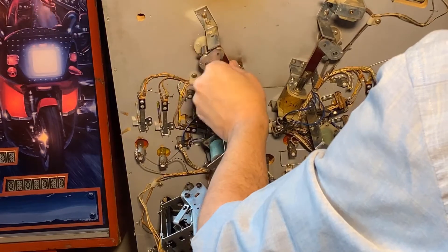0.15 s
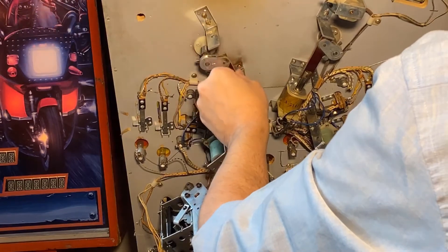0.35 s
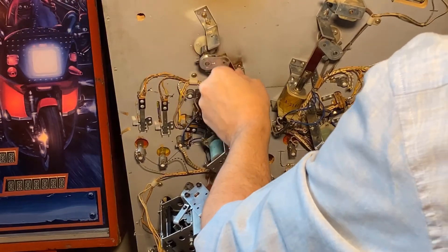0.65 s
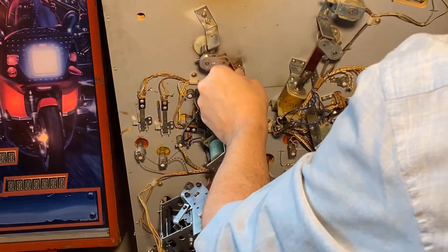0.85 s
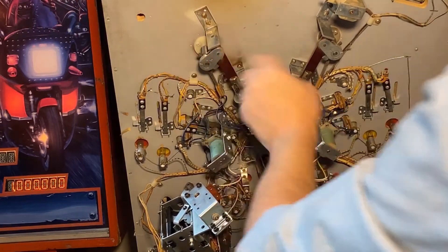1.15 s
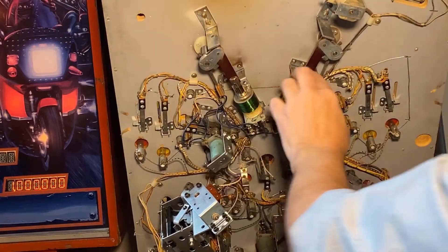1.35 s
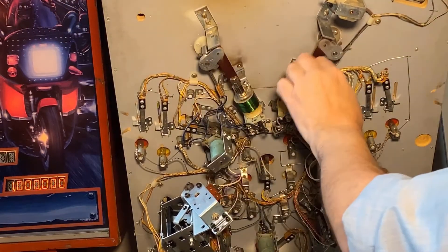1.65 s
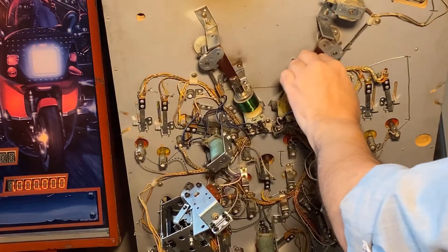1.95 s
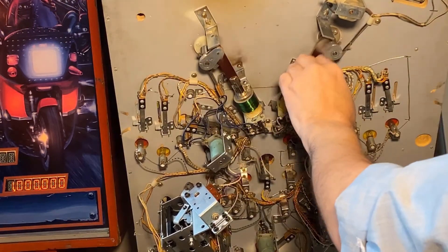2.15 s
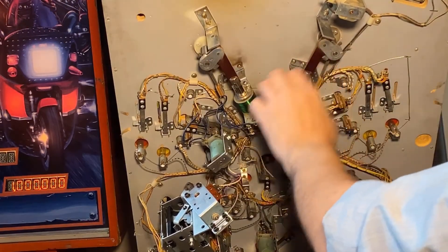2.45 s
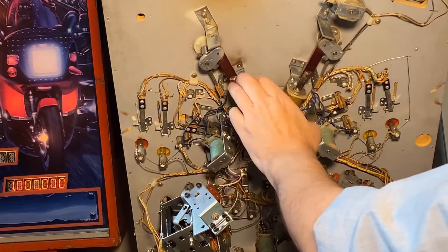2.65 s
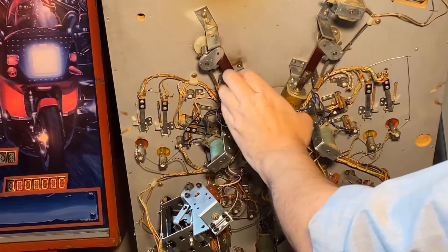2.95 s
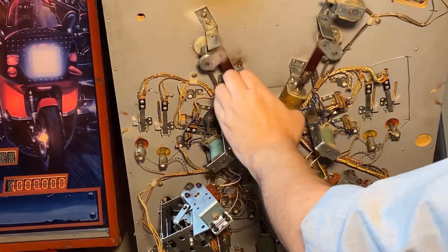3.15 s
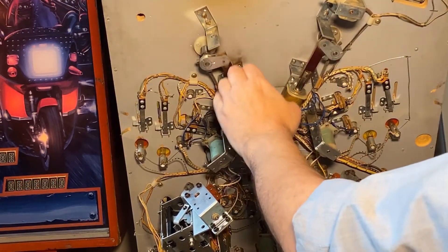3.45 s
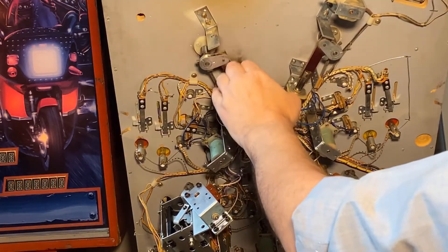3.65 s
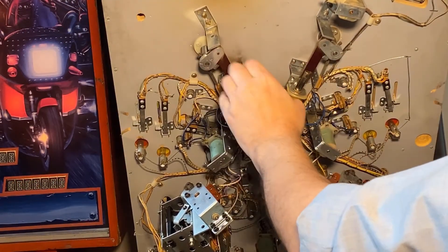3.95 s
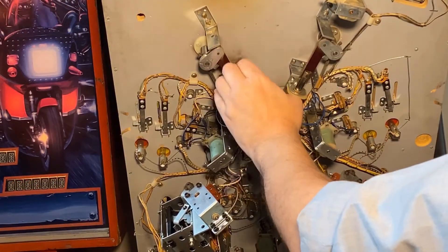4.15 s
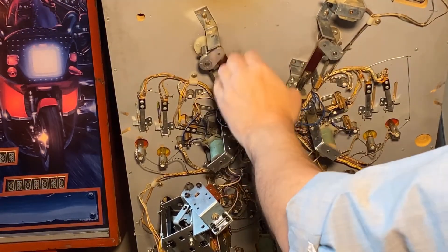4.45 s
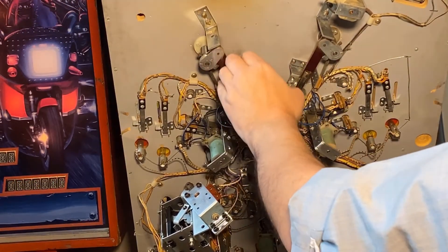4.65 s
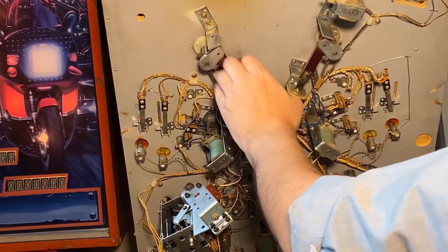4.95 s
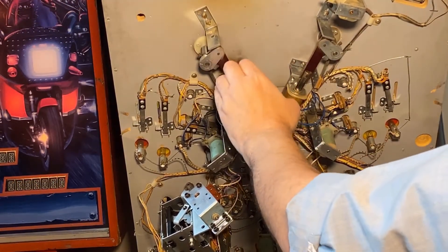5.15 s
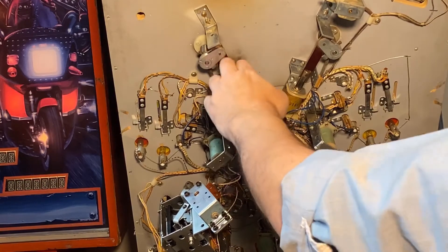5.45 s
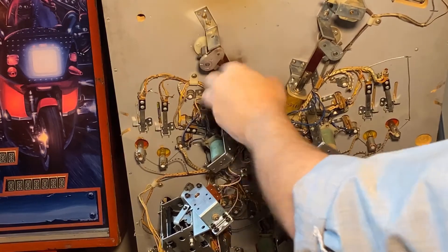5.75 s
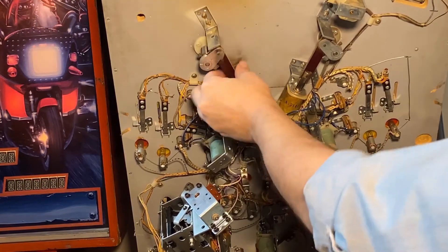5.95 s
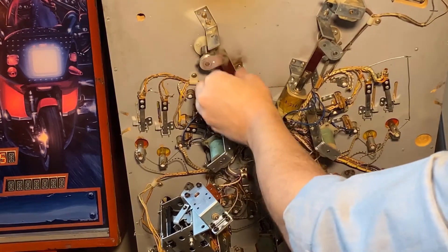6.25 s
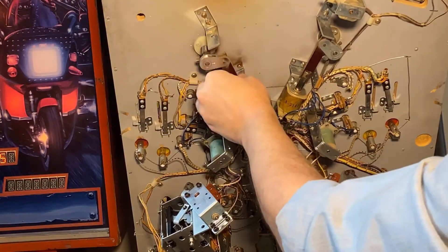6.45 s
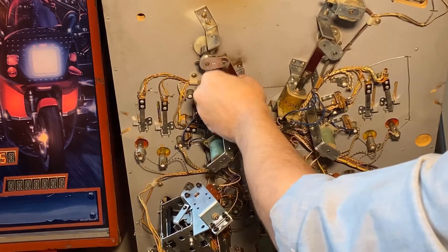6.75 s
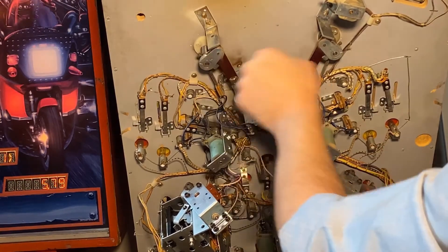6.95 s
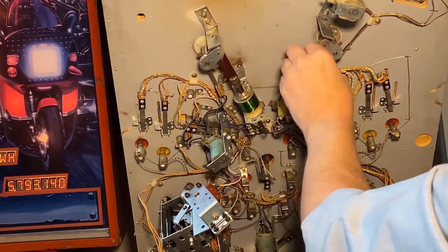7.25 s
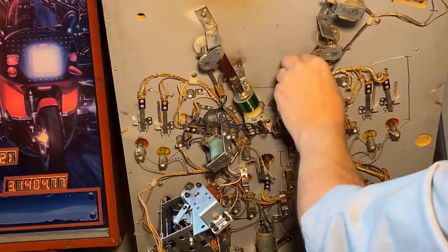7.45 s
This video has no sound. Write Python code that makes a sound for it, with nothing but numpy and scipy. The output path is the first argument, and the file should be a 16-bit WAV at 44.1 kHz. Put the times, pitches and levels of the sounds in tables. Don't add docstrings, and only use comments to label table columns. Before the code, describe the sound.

In a small workshop, a hand works two pinball flipper mechanisms close to a small camera microphone. Hard steel clacks at the stops are answered by woodier multi-blow clunks as the crank falls back. Two slow pairs come first, then a rapid run on the second mechanism, then spaced pairs on the first, and a final hard pair. Loose links tick, fingers rustle and tap, over low handling rumble.

```python
import sys
import numpy as np
from scipy import signal
from scipy.fft import rfft, irfft, next_fast_len
from scipy.io import wavfile
from scipy.ndimage import uniform_filter1d, map_coordinates

SR = 44100
rng = np.random.default_rng(int(sys.argv[2]) if len(sys.argv) > 2 else 0)


def attenuation_scalar(level_db):
    decades = np.asarray(level_db, float) / 20
    return 10 ** decades


def master(y):
    cut = np.clip(np.atleast_2d(y).T, -1, 1)
    pcm = np.round(cut * 32767)
    wavfile.write(sys.argv[1], SR, pcm.astype(np.int16))


N = 335138


def unit(x):
    return x / np.sqrt(np.mean(x ** 2) + 1e-20)


def along(points, hz):
    f, v = np.transpose(points)
    return np.interp(np.log(hz + 1), np.log(f + 1), v)


def wobble(rate):
    knots = rng.standard_normal(int(N * rate / SR) + 4)
    return map_coordinates(knots, [np.arange(N) * rate / SR])


def filtered(x, response, pad=8192):
    n = x.shape[-1]
    m = next_fast_len(n + pad)
    return irfft(rfft(x, m) * response(np.fft.rfftfreq(m, 1 / SR)), m)[..., :n]


def resonances(modes):
    skirt = 1.7

    def peak(f, centre, width):
        return (f * width) ** 2 / ((centre * centre - f * f) ** 2 + (f * width) ** 2)

    def response(f):
        power = sum(attenuation_scalar(2 * db) * peak(f, centre, width) ** skirt for centre, width, db in modes)
        cepstrum = irfft(np.log(power + 1e-9) / 2)
        cepstrum[1:len(f) - 1] *= 2
        cepstrum[len(f):] = 0
        return np.exp(rfft(cepstrum))
    return response


def noise(spectrum):
    return unit(filtered(rng.standard_normal(N), lambda hz: attenuation_scalar(along(spectrum, hz))))


def gestures(rows, rise, fall):
    t = np.arange(N) / SR
    gain = np.zeros(N)
    for s, held, db in rows:
        early = np.maximum(s - t, 0)
        late = np.maximum(t - s - held, 0)
        gain += attenuation_scalar(db - rise * early - fall * late)
    return gain


# f/Hz, level/dB per Hz
AIR = [(29, -43), (50, -13.5), (170, -11), (320, -18), (1500, -18), (2490, -29), (15300, -35), (16500, -41)]


def hush():
    return attenuation_scalar(-67) * noise(AIR)


# f/Hz, width/Hz, level/dB
FAN = [(172.1, 3, -5), (250, 24, -5.5), (350, 5.6, -2), (470, 49, -12.5), (1560, 48, -22.5)]


def far_fan():
    swell_db = 4 * wobble(3.2)
    return attenuation_scalar(-66 + swell_db) * unit(filtered(rng.standard_normal(N), resonances(FAN)))


# t/s, held/s, level/dB
SHAKE = [(0.62, 0.02, -67), (0.81, 0.092, -62), (1.05, 0.092, -61.5), (1.228, 0.013, -42),
         (1.275, .03, -51), (1.33, 0.027, -56), (1.46, 0.0092, -39), (1.53, 0.24, -52.5), (1.91, 0.19, -66),
         (2.25, 0.19, -64), (2.74, 0.093, -74), (3.15, 0.071, -54.5), (3.75, 0.022, -55),
         (4.27, 0.055, -59), (4.44, 0.026, -56), (4.62, 0.37, -65), (5.24, 0.34, -58.5), (5.63, 0.028, -66),
         (5.95, 0.039, -57), (6.06, .6, -65), (6.76, 0.13, -59), (7.0, 0.64, -70), (7.59, .01, -64)]
# f/Hz, level/dB per Hz
RUMBLE = [(12, -32), (25, 1), (60, -11), (110, -10), (200, -10.5), (400, -28), (800, -61.5)]
# t/s, level/dB, half width/s
KNOCKS = [
    (1.2543, -28, 0.0019),
    (1.6, -42, 0.0031),
    (1.3615, -44, 0.0035),
    (5.9717, -30.5, 0.0012),
    (4.446, -41, 0.0012),
]


def stand():
    grip = attenuation_scalar(-70) + gestures(SHAKE, rise=580, fall=400)
    rumble = grip * noise(RUMBLE)
    knocks, t = np.zeros(N + SR), np.arange(SR // 4) / SR
    for s, db, half_s in KNOCKS:
        u = (t - 0.02) / half_s
        knocks[round((s - 0.02) * SR):][:len(t)] -= attenuation_scalar(db) * (1 - u * u) * np.exp(-u * u / 2)
    drift = attenuation_scalar(-45) * unit(np.gradient(wobble(6.4)))
    return rumble + knocks[:N] + drift


# t/s, held/s, level/dB
HANDS = [(0.0, 0.014, -55.5), (0.5, 0.052, -49), (0.89, 0.17, -49), (1.3, 0.19, -55), (1.59, 0.074, -43),
         (1.86, 0.36, -43), (2.18, 0.092, -43), (2.7, 0.28, -55.5), (3.34, 0.059, -41.5), (3.65, 0.19, -54),
         (4.36, .04, -43), (4.7, .05, -50.5), (5.45, 0.4, -56), (6.05, 0.76, -49), (6.74, 0.032, -45.5),
         (7.13, 0.048, -42.5), (7.58, .03, -53)]
# f/Hz, level/dB per Hz
SKIN = [(120, -40.5), (250, -1), (500, -5.5), (800, -3), (1300, -14), (2200, -19.5), (4000, -27.5),
        (12000, -50)]


def hands():
    lumps = attenuation_scalar(2.5 * wobble(30) + 3 * wobble(150))
    movement = attenuation_scalar(-68.5) + gestures(HANDS, rise=240, fall=92)
    return attenuation_scalar(-5.5) * movement * unit(lumps * noise(SKIN))


# f/Hz, level/dB
SCATTERED = [(300, 4), (1500, 0), (4000, 0), (6300, 0), (8800, -6), (11000, -8), (14000, -6.5), (16000, -5)]


def dying_noise(decays, rise_s, size):
    z = signal.stft(rng.standard_normal(size), nperseg=512)[2]
    power = uniform_filter1d(uniform_filter1d(np.abs(z) ** 2, size=2, axis=0), size=3, axis=1)
    even = z / (power + 1e-12) ** 0.3
    even *= attenuation_scalar(2.5 * rng.standard_normal((len(z), 1)))
    hz, t, z = signal.stft(signal.istft(even, nperseg=512)[1][:size], SR, nperseg=128)
    patches = uniform_filter1d(rng.standard_normal(z.shape), size=3, axis=0)
    patches = unit(uniform_filter1d(patches, size=10, axis=1))
    fade_db = -60 * t / along(decays, hz)[:, None]
    z = z * attenuation_scalar(1.5 * patches + along(SCATTERED, hz)[:, None] + fade_db)
    tail = signal.istft(z, SR, nperseg=128)[1][:size]
    tail = tail * (1 - np.exp(-np.arange(size) / SR / rise_s))
    return tail / np.linalg.norm(tail)


# f/Hz, t60/s
ROOM = [(200, 0.48), (530, 0.32), (1400, 0.43), (3700, 0.3), (9700, 0.25), (16000, 0.21)]
# f/Hz, t60/s
RATTLE = [(300, 0.26), (1500, 0.2), (5000, 0.069), (12000, 0.043)]


def contacts(hits, strike_db, chatter_s, rattle_db, room_db, bounce_s=0, bounce_db=0, listed=()):
    out, t = np.zeros(N + SR), np.arange(3000) / SR
    wall = round(0.0094 * SR)
    for s, db, modes, wet_db in hits:
        blows = [(at, hard) for at, hard in listed if -0.003 < at - s < 0.02]
        blows = blows or [(s - 0.0005, 0), (s + bounce_s * rng.uniform(0.93, 1.4), bounce_db)]
        start, shape, strikes = blows[0][0], 0, np.zeros(len(t))
        for at, hard in blows:
            later = np.maximum(t - (at - start), 0)
            shape = shape + attenuation_scalar(hard - 60 * later / chatter_s) * (1 - np.exp(-later / 0.00023))
            strikes[round((at - start) * SR) + 14] = attenuation_scalar(hard) * rng.choice([-1, 1])
        strikes = np.convolve(strikes, np.hanning(5), "same")
        strikes /= np.linalg.norm(strikes)
        grain = attenuation_scalar(3 * np.repeat(rng.standard_normal(250), 12))
        chatter = shape * rng.standard_normal(len(t)) * grain
        force = chatter / np.linalg.norm(chatter) + attenuation_scalar(strike_db) * strikes

        def evenly(hz):
            power = np.abs(rfft(force, 2 * len(hz) - 2)) ** 2
            return 1 / np.sqrt(uniform_filter1d(power, size=70))

        force = filtered(force, evenly, pad=1096)
        force[wall:] += attenuation_scalar(-10.5) * force[:-wall]
        blow, ideal = filtered(np.array([force, t == 0]), resonances(modes), pad=1024)
        answer = attenuation_scalar(room_db - 3) * dying_noise(ROOM, 0.00055, size=18000)
        lumps_db = 3 * np.repeat(rng.standard_normal(100), 50)
        answer[:5000] += attenuation_scalar(rattle_db - 3 + lumps_db) * dying_noise(RATTLE, 0.0013, size=5000)
        sound = attenuation_scalar(wet_db) * signal.fftconvolve(ideal, answer)
        sound[:len(t)] += blow
        out[round(start * SR):][:len(sound)] += attenuation_scalar(db + 10.5) / np.linalg.norm(ideal) * sound
    return out[:N]


# t/s, peak level/dB, board f/Hz, board over shaken parts/dB, room level/dB
TAPS = [(0.713, -37, 720, 24, 5), (0.893, -35, 550, 26, 9.5), (0.921, -29.5, 570, 33, 2),
        (2.327, -22, 750, 18, -8), (3, -48, 900, 14.5, 8), (2.716, -42, 560, 19, -1),
        (2.78, -52, 780, 28, 9.5), (2.917, -36, 610, 18, 6.5), (2.964, -36, 1130, 19, 3),
        (3.079, -50, 630, 27, 12), (3.299, -29, 980, 20, 0), (3.471, -26.5, 900, 39, -6),
        (3.549, -52, 910, -2, -1), (3.596, -31.5, 530, 28, -1.5), (4.11, -50.5, 910, 42, 8),
        (4.8, -36.5, 710, 26, 5), (5.148, -37, 694, 34, -3), (7.148, -25, 700, 22, 1),
        (7.2915, -39.5, 635, 20, 5.5), (1.243, -50.5, 850, 30, 5), (1.378, -51, 1100, 30, 4.5),
        (0.47, -46, 1000, 29, -6), (2.833, -42, 1070, 16, 1), (6.566, -27.5, 2050, 16, 5.5),
        (3.6, -36, 580, 37, 3), (2.593, -34.5, 1230, 11, 0.5), (5.6, -31, 660, 35, -6),
        (0.004, -55.5, 1400, 38, 3.5), (1.3, -51.5, 860, 38, -2.5), (0.724, -40.5, 480, 28, 2.5),
        (7.8, -44, 1000, 28, 2), (2.985, -46, 840, 22, -1), (4.128, -47, 850, 38, -0.5)]
# t/s, peak level/dB, link f/Hz, board over link/dB, room level/dB
TICKS = [(0.609, -36.5, 4970, 5, -4), (0.725, -30, 4300, 12, -7), (0.871, -33, 4800, -17, -3),
         (1.433, -25.5, 3980, -14, 3.5), (1.536, -35, 7400, -13, 4.5), (2.214, -23, 5800, -16, -7),
         (2.591, -36, 8500, 4, 0.5), (2.632, -52.5, 5280, -0.5, 15.5), (2.639, -42, 4770, 3, 8.5),
         (6.564, -36, 7000, -1.5, 11.5), (2.914, -31, 8500, 8, -12), (3.217, -41, 3700, -5.5, 1),
         (3.978, -33.5, 5000, -0.5, -3.5), (4.657, -45, 6400, -2, 0), (4.721, -37.5, 4680, -1, -7),
         (4.727, -34.5, 4870, 8, 0), (4.888, -43, 5120, -1.5, 7.5), (5.558, -35.5, 5300, 2, 2),
         (5.642, -17.5, 5200, -11.5, 0), (5.954, -49.5, 4660, 2, 7), (6.297, -31, 6150, -23, -5),
         (6.766, -35, 3950, -3, 2), (7.105, -29.5, 3600, 2, 5), (7.2525, -42, 6100, -13, -7),
         (7.253, -44, 13700, -29, -6), (7.1435, -52, 7000, -4, 2), (0.898, -47.5, 10500, -18, 0),
         (6.493, -47, 10000, -9, 6), (7.268, -51, 5470, 1, 0), (7.3155, -55, 5500, -2, 1),
         (4.801, -48, 5000, -8, -4), (4.4058, -16.5, 2400, 4.5, -7.5), (7.106, -36.5, 5800, -18, 5),
         (6.17, -46, 12000, -20, 0)]
# t/s, peak level/dB
SLACK = [(0.256, -33), (0.77, -41), (1.387, -38), (1.734, -40), (1.992, -33.5), (2.178, -34),
         (3.112, -29.5), (3.318, -45.5), (4.239, -33), (5.439, -31.5), (6.064, -36), (6.371, -35.5),
         (6.63, -25.5), (7.362, -33.5)]
# f/Hz, width/Hz, level/dB
LINK_RING = [(1000, 810, 2.5), (2500, 1400, 2.5), (4970, 1200, 3), (8850, 8900, 1), (12500, 4800, -10.5)]


def links_and_taps():
    taps, ticks = [], []
    for s, db, hz, board, wet_db in TAPS:
        modes = [(hz, hz / 2.6, board + 3), (1000, 900, board - 8), (4700, 2200, 0), (8000, 2600, -11)]
        taps.append((s, db, modes, wet_db))
    for s, db, hz, board, wet_db in TICKS:
        knock = [(600, 450, board + 3), (1250, 700, board - 1.5), (2400, 1200, board / 2 - 6)]
        ticks.append((s, db, knock + [(hz, hz / 5, 0), (8200, 3500, -7)], wet_db))
    slack = [(s, db, LINK_RING, 0) for s, db in SLACK]
    loose = contacts(ticks, 0, 0.008, rattle_db=-1, room_db=-1, bounce_s=0.0098, bounce_db=-20)
    loose += contacts(taps, 4, 0.012, rattle_db=-2, room_db=-2, bounce_s=0.007, bounce_db=-7)
    loose = filtered(loose, lambda hz: 1 / np.sqrt(1 + (hz / 11500) ** 10))
    scrape = contacts(slack, -12, 0.02, rattle_db=2, room_db=-10.5, bounce_s=0.0073, bounce_db=-3)
    return loose + scrape


# f/Hz, width/Hz, level/dB
CRACK = [(540, 695, -14), (1424, 2010, -5.5), (4560, 4300, -17), (8500, 1600, -11.5), (12100, 1300, -27),
         (14800, 2600, -32.5)]
PARTS_HZ = [480, 1700, 4500, 9000, 12000]
# t/s, low f/Hz, level/dB, high f/Hz, level/dB
FAVOURED = [(0.282, 1500, -9, 3080, -10), (0.485, 676, 1.5, 2960, -7.5), (0.786, 425, -3.5, 7760, 2.5),
            (0.964, 470.0, -2.5, 2540, -5.5), (1.403, 1620, 2, 2630, -7.5), (1.579, 1034, 1, 4910.0, -8),
            (1.749, 752, -1, 3170, -6.5), (1.874, 470.0, -9, 2500.0, -0.5), (2.003, 1530, 1.5, 3740, -5),
            (2.102, 645, -4.5, 2250, 0), (2.19, 1367, -5, 3350, -7.5), (2.288, 760, -11, 2450, -4.5),
            (3.122, 471, -9, 3710.0, -11), (3.331, 580, 0, 2780, -8), (3.709, 940, -6, 2290, 3.5),
            (4.247, 750, -5.5, 2320, -2.5), (4.383, 596, 1, 2260.0, -1.5), (5.447, 894, -4, 2830, 1),
            (5.605, 1183, -1, 2330, -1), (6.075, 1325, 0, 2630, -7.5), (6.231, 1094, -3, 6240, -6.5),
            (6.391, 470.0, -4, 2590, -7), (6.64, 1330, 3, 2720, 0), (6.808, 470.0, -8, 6000, -11),
            (7.375, 1297, 0, 3900, -9), (7.52, 1154, 7.5, 2190, -5)]
# t/s, top treble level/dB, room level/dB
EDGE = [(0.282, 7.5, -1.5), (0.485, -5, -4), (0.786, -5.5, -1), (0.964, -3, -0.5), (1.403, 2, 0),
        (1.579, 5, 2), (1.749, 4.5, 1), (1.874, 4, -1), (2.003, 2, 1.5), (2.102, -2, 0.5), (2.19, 5.5, 1),
        (2.288, -4, 0.5), (3.122, 5, -1), (3.331, 8.5, -2.5), (3.709, 0.5, 1), (4.247, 2.5, -2.5),
        (4.383, 2, -2), (5.447, -8, -0.5), (5.605, -0.5, 0), (6.075, 16, 1), (6.231, -7, -0.5),
        (6.391, 15.5, 2.5), (6.64, 12, 2), (6.808, 2, -2.5), (7.375, 0, 0.5), (7.52, -2, -1.5)]


def clacks(rows, ring, kin=[]):
    usual = np.median(np.array(rows + kin)[:, 2:5], axis=0)

    def nearest(table, s):
        return min(table, key=lambda row: abs(row[0] - s))[1:]

    for s, db, board, crank, plunger in rows:
        low, low_db, high, high_db = nearest(FAVOURED, s)
        edge_db, wet_db = nearest(EDGE, s)
        reach = np.insert([board, crank, plunger] - usual, 1, 0)
        parts = np.transpose([PARTS_HZ, np.append(reach, reach[-1] + edge_db)])
        damped = [(c, max(w, c / 36), g + rng.normal(0, 1.5)) for c, w, g in ring]
        best = [(c, c / 24 * (1 + c / 8000), g + 2) for c, g in [(low, low_db), (high, high_db)]]
        yield s, db, [(c, w, g + along(parts, c)) for c, w, g in damped + CRACK] + best, wet_db


# t/s, peak level/dB, board level/dB, crank level/dB, plunger level/dB
PINCHED_STOP = [
    (0.282, -8, -33.5, -36, -12.5),
    (0.786, -3.5, -30.5, -21.5, -6),
    (6.075, -6, -52, -34, -16),
    (6.391, -14, -32.5, -21.5, -13.5),
    (6.64, -3, -32.5, -22.5, -12),
]
# t/s, peak, board, crank, plunger level/dB
LEFT_STOP = [
    (3.122, -7, -40, -26.5, -11),
    (3.331, -9, -36, -36, -12.5),
    (4.247, -6, -36.5, -29.5, -12.5),
    (5.447, -3, -28, -19, -4),
]
# t/s, peak, board, crank, plunger level/dB
LEFT_REST = [
    (0.485, -24, -14.5, -20, -8.5),
    (0.964, -9, -10, -14, -5),
    (3.709, -10.5, -9.5, -12, -7.5),
    (4.383, -5, -12, -9, -10.5),
    (5.605, -6, -14.5, -8.5, -10),
    (6.231, -13.5, -17, -14.5, -16),
    (6.808, -3, -17, -13.5, -12.5),
]
# t/s, peak, board, crank, plunger level/dB
RIGHT_STOP = [
    (1.403, -7.5, -27.5, 4, -16.5),
    (1.749, -13.5, -24, -4.5, -15.5),
    (2.003, -7, -33, 8.5, -15.5),
    (2.19, -7, -34.5, -8, -15.5),
    (7.375, -6, -21.5, 10.5, -5),
]
# t/s, peak, board, crank, plunger level/dB
RIGHT_REST = [
    (1.579, -10, -21, -19.5, -16.5),
    (1.874, -12, -14, -19, -18.5),
    (2.102, -12.5, -18, -22, -21),
    (2.288, -9.5, -19, -18, -21.5),
    (7.52, -0.5, -23.5, -17.5, -18),
]
# f/Hz, width/Hz, level/dB
PINCHED_RING = [(489, 65, -3.5), (1134, 180, -5.5), (1390, 98, -4), (1548, 39, -5.5), (2212, 130, -4.5),
                (2967, 130, -8), (3383, 220, -8.5), (3780, 670, -8.5), (7245, 400, -5.5), (8180, 780, -5.5),
                (8860, 820, -1.5), (10360, 520, -15)]
LEFT_STOP_RING = [(726, 160, -8), (1150, 250, 1), (1367, 94, 4.5), (1610, 65, -1.5), (1950, 200, -6),
                  (2270, 230, -3.5), (2600, 110, 0), (2870, 81, -9), (3600, 330, -7.5), (6840, 680, -16.5),
                  (8920, 2070, -1.5), (9900, 1100, -11)]
LEFT_REST_RING = [(330.3, 20, -6.5), (473, 38, -8.5), (567, 62, -4), (742, 31, -2.5), (1260, 150, -10.5),
                  (1588, 38, -0.5), (1950, 120, -2.5), (2190, 420, -3.5), (2700, 300, -8.5),
                  (4100, 680, -14), (4980, 1700, -11), (6770, 1500, -10.5)]
RIGHT_STOP_RING = [(487, 29, -24), (840, 59, -18), (1338, 81, 3.5), (1537, 39, -7), (2170, 420, -6.5),
                   (2250, 120, -22.5), (3710, 450, -3.5), (4600, 450, -5.5), (7000, 620, -9),
                   (9140, 1200, -13), (11730, 3100, -18.5)]
RIGHT_REST_RING = [(475, 33, -2.5), (710, 200, -4.5), (1100, 140, -5), (1217, 77, -13.5), (1370, 160, -2),
                   (1722, 47, 2), (2477, 130, -4), (2830, 67, -4.5), (4450, 840, -8), (5280, 480, -11),
                   (6250, 1000, -11), (8820, 420, -25)]
# t/s, level/dB relative to the other blows of that clack
IMPACTS = [(0.2817, -1), (0.2853, -11), (0.4844, 8), (0.4915, -11), (0.5017, -18.5), (0.7857, 0),
           (0.9643, 1), (0.969, -8), (0.9755, -6), (1.4036, -2), (1.4063, -3), (1.4122, -3.5), (1.5781, 1),
           (1.5835, 6), (1.5905, -10.5), (1.7504, 4), (1.7573, -5), (1.7611, -9), (1.8745, 0),
           (1.8818, -10), (1.8883, -14), (2.0041, 0), (2.1027, -1), (2.1076, -3), (2.1149, -13),
           (2.1904, 5), (2.1968, -7), (2.1987, -17), (2.2882, 8), (2.2927, 5), (2.2958, -6), (3.1222, 0.5),
           (3.3317, -0.5), (3.7107, 7), (3.7161, 0), (3.7186, -4), (4.2481, 0), (4.3827, 2), (4.3862, 0.5),
           (4.3896, -7.5), (5.4481, 4), (5.4532, -5), (5.4595, -8.5), (5.6054, 3), (5.6091, 3.5),
           (5.6121, -9), (6.0762, -4), (6.2312, -2), (6.2369, -5), (6.3907, -2), (6.6398, 5), (6.6431, -13),
           (6.8082, 3), (6.8129, 3), (6.8147, -2), (7.375, 8), (7.3797, -7), (7.5198, -7), (7.5232, 0),
           (7.5291, -9)]


def flippers():
    def part(hits, strike_db, chatter_s, rattle_db, room_db):
        return contacts(hits, strike_db, chatter_s, rattle_db, room_db, listed=IMPACTS)

    pinched = clacks(PINCHED_STOP, PINCHED_RING, LEFT_STOP)
    left_stop = clacks(LEFT_STOP, LEFT_STOP_RING, PINCHED_STOP)
    left = part(pinched, -3, 0.01, rattle_db=-2.3, room_db=-1.4)
    left += part(left_stop, -3, 0.01, rattle_db=1, room_db=2.5)
    left += part(clacks(LEFT_REST, LEFT_REST_RING), -5, 0.0051, rattle_db=3, room_db=3.5)
    right = part(clacks(RIGHT_STOP, RIGHT_STOP_RING), -5, 0.014, rattle_db=-1, room_db=0)
    right += part(clacks(RIGHT_REST, RIGHT_REST_RING), -5, 0.011, rattle_db=2, room_db=1)
    return left + right


# t/s, click level/dB, thump level/dB
BUMPS = [
    (1.2208, -13.5, -35.5),
    (1.253, -66, -46),
    (1.459, -72.5, -54),
    (4.4455, -67.5, -53),
    (5.969, -38.5, -50.5),
]


def microphone_bumps():
    knocks, t = np.zeros(N + SR), np.arange(SR // 4) / SR
    port = resonances([(6530, 660, 7), (3960, 3200, -9.5), (2055, 20, -6), (924, 1900, -21.5)])
    body = resonances([(55, 56, 7.5), (115, 49, -5), (258, 420, -8)])
    click = filtered(np.exp(-(t / 0.00006 - 1.5) ** 2), port)
    click /= np.abs(click).max()
    thump = unit(filtered(np.exp(-(t / 0.00083 - 1.5) ** 2), body))
    for s, click_db, thump_db in BUMPS:
        knocks[round(s * SR):][:len(t)] += attenuation_scalar(click_db) * click + attenuation_scalar(thump_db - 5.5) * thump
    return knocks[:N]


# t/s, held/s, level/dB
SLEEVE = [
    (1.25, 0.024, -66),
    (1.32, 0.11, -62),
    (3.555, 0.0032, -67.5),
    (4.078, 0.099, -88),
    (5.19, 0.089, -79),
    (5.3, 0.038, -72),
    (5.37, .06, -83.5),
    (5.87, 0.045, -77),
    (5.93, 0.044, -72),
    (5.99, 0.059, -75),
]


def sleeve():
    cloth = attenuation_scalar(1.8 * wobble(200)) * rng.standard_normal(N)
    cloth = filtered(cloth, resonances([(6520, 500, 0.011)]))
    cloth = filtered(cloth, resonances([(6400, 1300, -22), (4970, 1900, -0.5)]))
    return gestures(SLEEVE, rise=500, fall=500) * unit(cloth)


def scene():
    background = hush() + far_fan() + stand()
    mechanism = hands() + links_and_taps() + flippers()
    return (background + mechanism + microphone_bumps() + sleeve())[None]


def roll_off(x):
    return signal.sosfilt(signal.butter(12, 17010, fs=SR, output="sos"), x)


def record(dry):
    rolloff = [(15650, -0.5), (16000, -13.5), (16900, -22), (17100, -90)]  # f/Hz, level/dB
    mix = filtered(dry, lambda hz: attenuation_scalar(along(rolloff, hz)))
    return roll_off(mix)


dry = scene()
out = record(dry)
master(out)
```